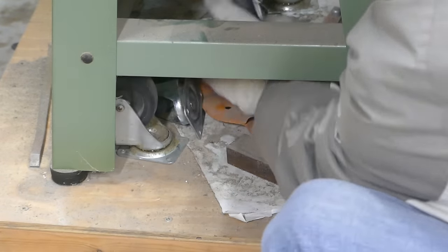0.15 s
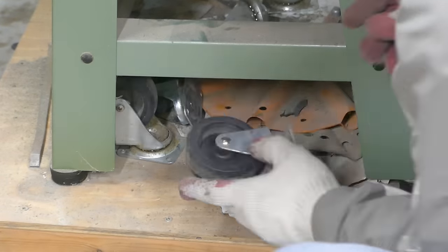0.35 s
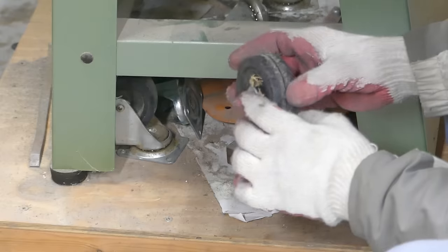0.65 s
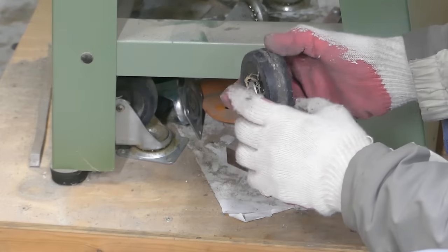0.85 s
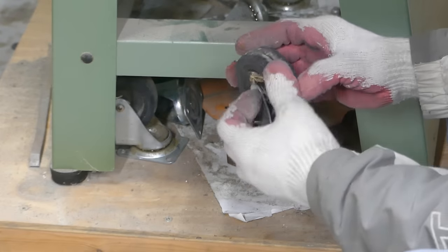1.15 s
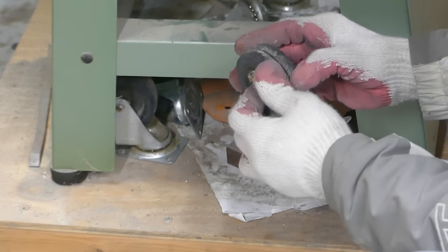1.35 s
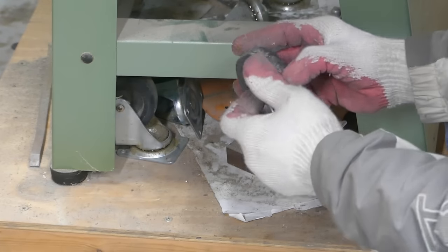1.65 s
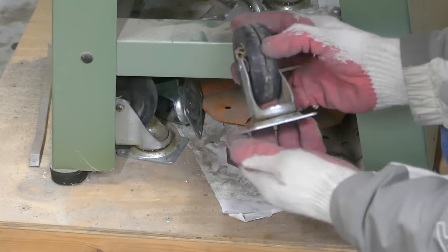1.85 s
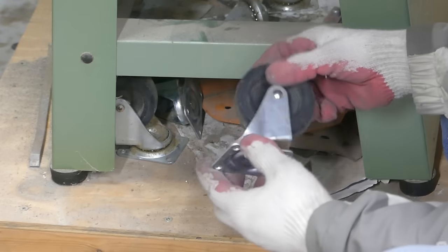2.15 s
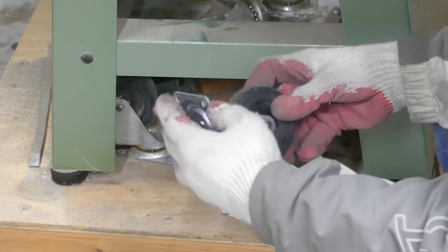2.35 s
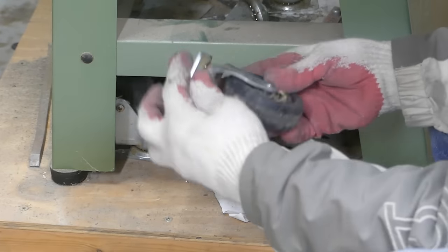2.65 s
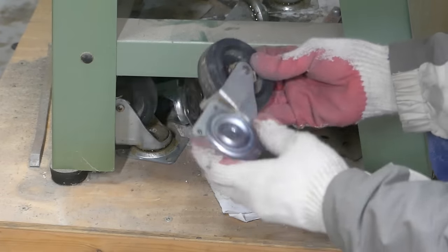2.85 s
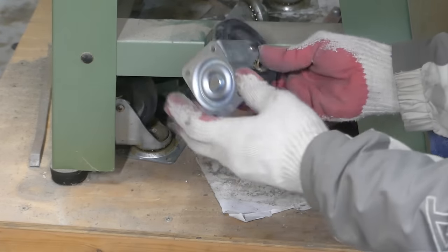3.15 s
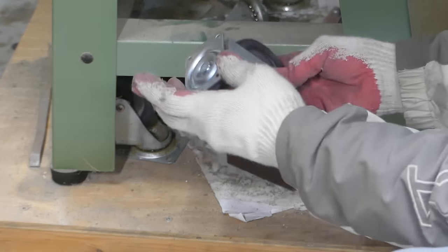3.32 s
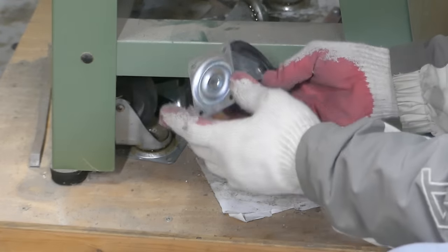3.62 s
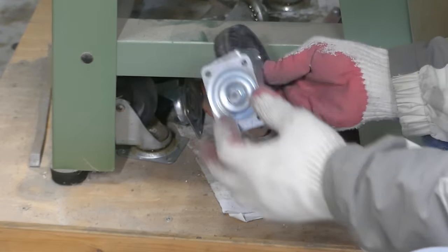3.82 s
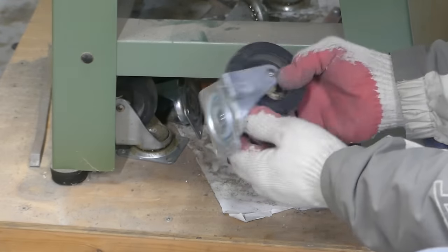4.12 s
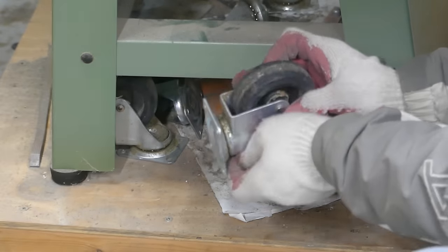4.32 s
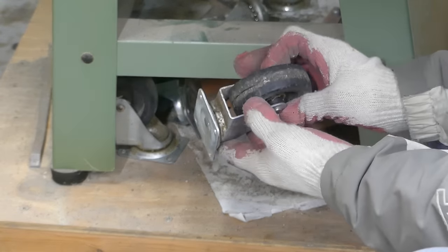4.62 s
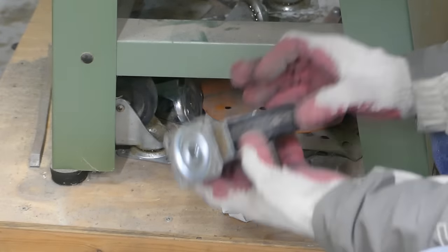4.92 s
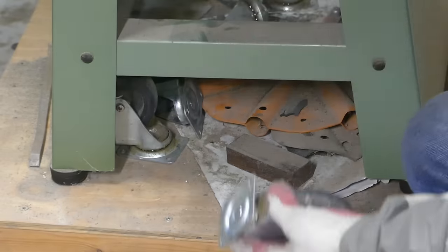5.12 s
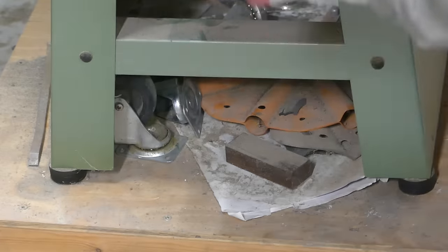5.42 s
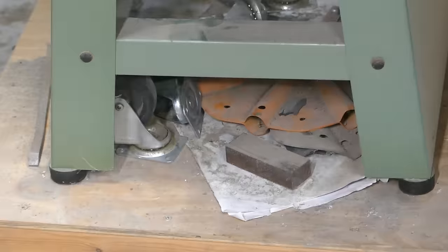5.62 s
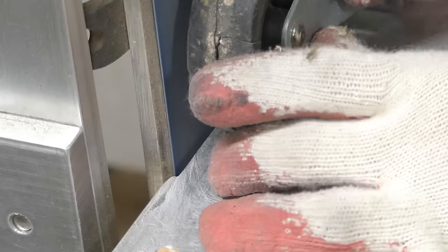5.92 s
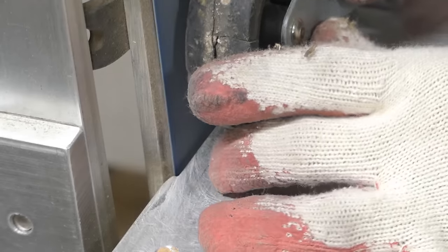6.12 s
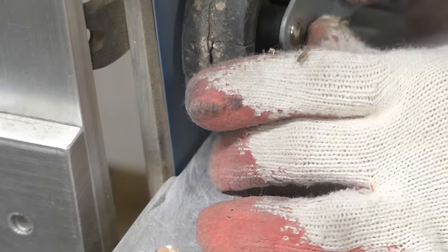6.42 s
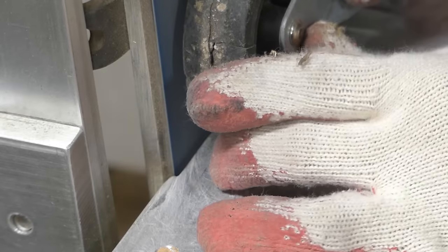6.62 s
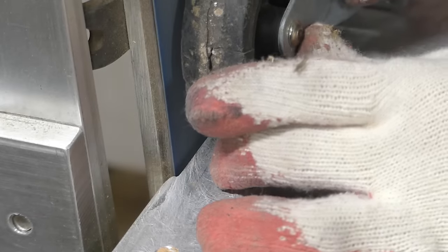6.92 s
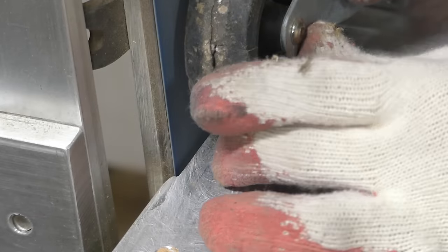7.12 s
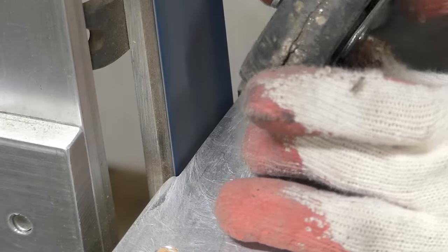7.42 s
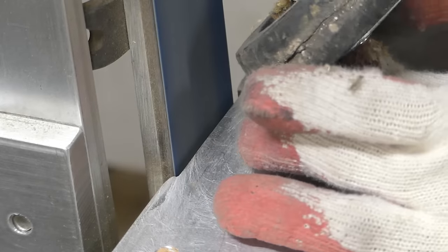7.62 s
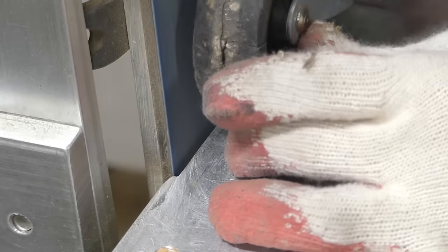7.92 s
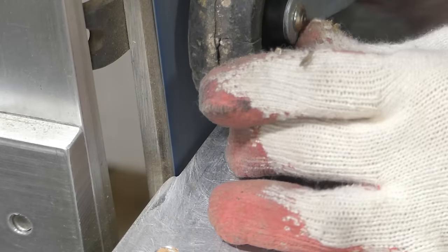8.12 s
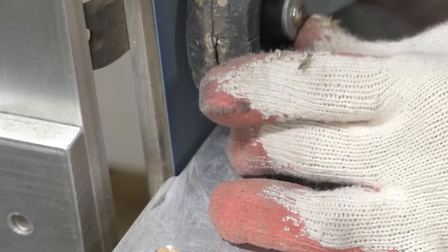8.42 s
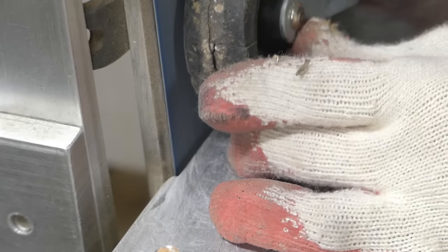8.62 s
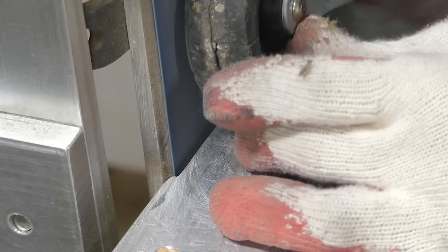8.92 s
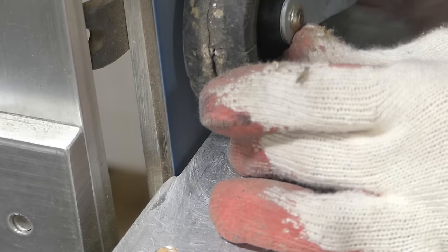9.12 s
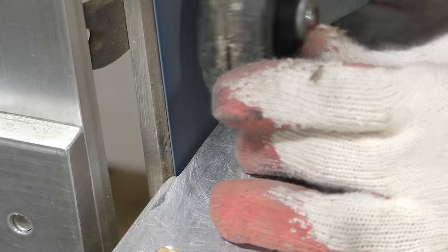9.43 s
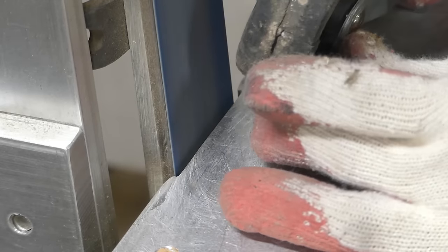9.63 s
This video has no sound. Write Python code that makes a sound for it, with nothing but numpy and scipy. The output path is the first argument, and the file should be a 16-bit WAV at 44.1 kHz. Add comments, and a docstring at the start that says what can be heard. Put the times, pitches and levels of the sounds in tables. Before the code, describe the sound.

Knocks, small metallic clinks and glove rustle in a quiet workshop, cut suddenly to a loud humming, rattling belt grinder with abrasive hiss.

```python
"""A belt grinder runs close by after an abrupt start: motor lines hum and beat slowly as the shaft slips,
scuffed resonators buzz as the belt arm twice a turn, and coloured noise hisses as abrasive on a caster.
Before it, gloved hands pull that steel caster from under a machine stand: enveloped noise and ringing modes
clatter on the wooden bench, then short bursts clink and pitched swells slide as it is turned over.
Gloves and sleeves brush as noise strokes, over quiet room air with a drone and a thin whirr."""
import sys
import numpy as np
from scipy import signal
from scipy.fft import rfft, irfft, next_fast_len
from scipy.io import wavfile

SR = 44100
rng = np.random.default_rng(int(sys.argv[2]) if len(sys.argv) > 2 else 0)


def unload_wav(signal):
    """Save mono or channel-first audio to the path in sys.argv[1] as 16-bit WAV at rate SR, clipped to [-1, 1]."""
    wavfile.write(
        sys.argv[1],
        SR,
        np.round(np.clip(np.atleast_2d(signal).T, -1, 1) * 32767).astype(np.int16),
    )


N = 430416
TIME = np.arange(N) / SR

START_S = 5.790   # the handling stops and the grinder sounds
LINE_HZ = 59.96   # two cycles make one shaft turn
# the shaft slips behind the mains and comes back into step once in this time, so the machine beats slowly
SLIP_S = 2.12
# the belt and arm run louder at first: extra level in dB, and the time constant of its decay
SETTLE_DB, SETTLE_S = 2.3, 0.47
CUTOFF_HZ = 15850
# between strokes the hands never quite rest
RESTING_BRUSH_DB, RESTING_FOLDS_DB = -72, -68.5
CLINK_ATTACK_S = 0.0006
# the ring is a peak in dB above the steel colour, the width its half width
SLIDE_SWELL_S, SLIDE_T60_S, SLIDE_WIDTH_HZ, SLIDE_RING_DB = 0.045, 0.35, 330, 15

# In colour tables each row: frequency in Hz, relative level in dB per Hz; a layer's level is set where it is mixed.
# In resonance tables each row: frequency in Hz, width in Hz, relative gain in dB.

# Workshop air, a colour table; then the modes of its faint drone, a resonance table.
AIR_COLOUR = [(30, -26.5), (79, -19), (130, -10), (215, -1.5), (540, -1.5), (1130, -5.5), (1700, -16.5),
              (2350, -13), (3400, -12), (7470, -21), (12600, -19), (16000, -26.5)]
DRONE_MODES = [(202, 7.9, 0.5), (261, 4.5, 2), (500, 6, -22.5)]
# Colours of the noise that feeds the drone and the whirr, and the whirr's one resonance.
DRONE_FEED = [(80, -19), (180, -7), (300, 2), (700, -13.5)]
WHIRR_FEED = [(900, -28), (1500, -2), (1800, -0.5), (2600, -9)]
WHIRR_MODES = [(1644, 125, 0)]
# Left-right likeness of the room, the hands, and the bench and grinder.
# Each row: frequency in Hz, likeness from -1 to 1.
FAR_LIKENESS = [(60, 0), (130, 0.59), (640, -0.91), (1400, -0.28), (3100, -0.12), (7000, -0.093),
                (15000, 0.67)]
HANDS_LIKENESS = [(100, 0.56), (700, 0.44), (3000, 0.59), (7000, 0.78), (15000, 1)]
NEAR_LIKENESS = [(60, 0.86), (300, 0.82), (1400, 0.87), (3000, 0.72), (15000, 0.84)]
# Strokes of gloves and sleeves. Each row: middle in seconds, time in seconds from there to 1/e of the power,
# brushing peak in dB, cloth fold peak in dB, both before their uneven grain.
STROKES = [(0.27, 0.079, -55, -47.5), (0.463, 0.088, -53.5, -51), (0.667, 0.061, -52, -54.5),
           (1.1, .1, -64, -70), (1.59, .07, -64, -69), (2.03, 0.19, -61.5, -67), (2.46, 0.12, -61.5, -71),
           (2.834, .11, -59, -64.5), (3.37, 0.086, -63, -61.5), (3.935, .045, -59.5, -62),
           (4.165, 0.059, -58, -59), (4.32, 0.045, -59.5, -60.5), (4.5, .045, -63.5, -71),
           (5.042, .045, -57.5, -58.5), (5.418, 0.18, -51, -52.5), (5.64, 0.2, -50.5, -51)]
# Colours of brushing and of folding cloth.
BRUSH_COLOUR = [(1200, -27.5), (2500, 1), (4500, 3.5), (7000, 1), (10000, -2), (13500, -1.5), (16000, -11)]
FOLDS_COLOUR = [(150, -14.5), (400, -3), (750, 4), (1400, 1.5), (2500, -0.5), (5000, -14.5)]
# Steel sliding on steel. Each row: start in seconds, level in dB before the swell and decay, pitch in Hz.
SLIDES = [(1.54, -52, 6200), (1.57, -49, 7850)]
# Swivel and plate clinks. Each row: start in seconds, level in dB, t60 in seconds, plate ring in dB,
# pitch of the touched part in Hz, its ring in dB, dull body in dB relative to the steel.
CLINKS = [(0.185, -28, .13, 0, 3250, 36, -11), (0.680, -43.5, 0.15, 0, 10000, 5, -18),
          (0.812, -49.5, 0.34, 6, 10300, 6, -21), (1.117, -49, .14, 6, 4050, 11, -13),
          (1.268, -53.5, 0.33, 2, 5100, 10, -8), (1.479, -49.5, 0.26, 18, 10200, 6, -18),
          (1.776, -31.5, 0.21, 13, 8000, -2, -14), (1.996, -47, .19, 8, 3600, 5, -14),
          (2.161, -44, 0.31, 10, 6100, 5, -3.5), (2.468, -56.5, 0.36, 20, 10900, 5, -19),
          (2.595, -41.5, 0.23, 10, 8500, 10, -4), (2.826, -43, 0.19, 12, 8100, 3, -22),
          (2.835, -46, .15, 10, 6550, 22, -20), (3.051, -52.5, 0.18, 8, 4200, 12, -8),
          (3.35, -49, 0.18, 2, 4550, 14, -1), (5.447, -29, 0.16, 13.5, 13750, 5, -19),
          (5.618, -32, 0.13, 2, 4750, 2.5, -12), (5.626, -33, .15, 5, 4750, 2, -19),
          (5.723, -35.5, .11, 13, 6600, 12, -8)]
# Modes of the caster's top plate. Each row: frequency in Hz, half width in Hz, factor on the plate ring's dB.
PLATE_MODES = [(5780, 320, 1.0), (4570, 60, 0.05), (6540, 110, 0.3), (8010, 120, 0.76), (8800, 90, 0.2),
               (9490, 64, 0.1), (13600, 110, 0.6)]
# Colours of the steel contact and of the wheel's body.
CLINK_COLOUR = [(1000, -13.5), (2500, -4.5), (4000, -1.5), (6000, -0.5), (7200, -1), (9500, -1.5),
                (12500, -5.5), (16000, -10)]
BODY_COLOUR = [(150, -49), (500, -4.5), (1300, 2), (2500, 2), (4500, -4.5), (9000, -35)]
# Caster on the bench. Each row: start in seconds, thud in dB and crack in dB before the mix trims,
# t60 in seconds before each part stretches it.
KNOCKS = [(0.002, -13.5, -26.5, 0.091), (0.011, -25, -42, 0.065), (0.026, -20, -30, 0.15),
          (0.048, -18.5, -38, 0.16), (0.054, -20, -48, 0.17), (0.075, -20, -43, 0.22),
          (0.119, -33, -62, 0.17), (0.15, -25.5, -28.5, 0.22), (0.166, -27, -42, 0.11),
          (0.187, -29, -41, 0.2), (0.312, -49, -62, 0.13), (0.393, -55, -49, .2), (0.410, -52, -42.5, 0.21),
          (5.612, -43, -46, 0.089), (5.625, -37, -47, 0.096)]
# Resonances of the bench board, and the colour of the noise that drives them.
BOARD_MODES = [(314, 5.3, -4), (446, 25, -14), (580, 33, -9), (677, 29, 3.5), (766, 50, 1), (1060, 72, 8),
               (1170, 95, 8.5)]
BOARD_FEED = [(150, -15), (450, 15.5), (1500, -16.5), (4000, -18.5)]
# Colours of thud and crack.
THUD_COLOUR = [(30, -21), (280, -35), (420, -15.5), (650, 6), (900, -5.5), (1150, 1.5), (1800, -6.5),
               (3000, -18), (6000, -25.5), (16000, -50)]
CRACK_COLOUR = [(500, -6.5), (1800, 4), (3300, 3), (4600, -5.5), (8000, -2.5), (12000, -9.5), (16000, -14)]
# Motor and frame vibration. Each row: multiple of the line rate (rounded to the nearest half when played),
# rms level in dB before beating, beat depth from 0 to 1, time of a crest in seconds.
HUM_LINES = [(4, -33.5, 0.05, 7.4), (5, -47, 0.2, 6.14), (5.492, -44, 0.2, 6.7), (6, -39, 0.76, 7.62),
             (7, -49, 0.54, 7.36), (7.99, -36.5, 0.7, 7.3), (9.025, -38.5, 0.34, 7.5),
             (10.02, -42, 0.3, 7.47), (10.54, -42.5, .45, 6.86), (11, -40, 0.7, 7.57),
             (12, -33.5, 0.4, 6.6), (13.04, -37.5, .4, 6.14), (14, -43, .25, 6.6), (15, -50, 0.7, 7.87),
             (16.06, -34.5, 0.31, 7.78), (16.98, -43, 0.3, 7.75), (17.92, -40.5, .55, 6.83),
             (19.93, -41, .2, 7.9), (21, -44.5, 0.9, 6.05), (22.07, -45.5, .45, 7.7), (23, -33, 0.34, 6.08),
             (24, -41.5, 0.5, 6.7), (25, -37, 0.2, 7.72), (25.97, -39, 0.8, 7.89), (26.96, -53, .3, 5.3),
             (27.9, -52, 0, 5.6), (31, -44, 0.9, 7.9), (38.2, -46.5, 0.7, 7.2)]
# Lines that also beat twice a slip cycle. Each row: multiple of the line rate, beat depth from 0 to 1,
# time of a crest in seconds.
DOUBLE_BEATS = [(10, .35, 6.25), (14, 0.2, 6.84), (16, 0.49, 6.77), (17, 0.6, 6.53), (20, 0.54, 6.43),
                (24, 0.2, 6.54), (25, 0.5, 6.32)]
# Balance of the hum. Each row: frequency in Hz, left minus right in dB.
HUM_PAN = [(240, -1.0), (400, -2.5), (700, -2.0), (1300, 1.8)]
# Resonances of the belt arm and of the rubbed caster.
ARM_MODES = [(1436, 36, 6), (1471, 35, 6.5), (1645, 76, -14.5), (1864, 72, -11.5), (2060, 30, -8),
             (2290, 37, -7.5), (2534, 47, -6), (4200, 51, -12)]
RUBBED_MODES = [(4200, 180, 9), (4870, 25, 15), (5300, 66, 9.5), (6220, 65, 14.5), (8910, 300, 4.5),
                (12200, 43, -13)]
# Colours of the shaken frame, the belt over its platen, the grit cutting, and the air the grinder stirs.
FRAME_COLOUR = [(200, -25), (380, -10.5), (470, -0.5), (570, -0.5), (670, -10), (850, -21), (2000, -50)]
BELT_COLOUR = [(200, -28), (330, -2), (600, -7), (790, 4.5), (1100, 2.5), (1450, 7.5), (1900, 1),
               (2700, -9.5), (3500, -33), (8000, -22)]
GRIT_COLOUR = [(1200, -19), (2500, 0), (3200, -2.5), (4100, 2), (5400, 0.5), (6200, 2), (7500, -4),
               (8900, -2), (10500, -6), (13500, -6), (16000, -13.5)]
DRAUGHT_COLOUR = [(25, -6), (60, -5.5), (130, -5.5), (220, 4), (330, 3.5), (700, 11.5), (2000, -6.5)]
# Beats of frame, belt and arm, and the arm's faster flutter. Each holds: level in dB before beating,
# beat depth from 0 to 1, beats per slip cycle (rounded when played, 0 is a steady lift), time of a crest in seconds.
FRAME_BEAT = (-36, .6, 1, 7.5)
BELT_BEAT = (-27.5, 0.26, 1.5, 7.85)
ARM_BEAT = (-32.5, 0.27, 0, 7)
ARM_FLUTTER = (0, .18, 4, 5.92)
# How hard the caster is pressed on the belt. Each row: time in seconds, abrasive hiss in dB before trim and grain.
PRESSURE = [(5.82, -24.5), (5.95, -25.5), (6.64, -24.5), (7.3, -26), (9.05, -24.5), (9.71, -26),
            (9.74, -24)]


def from_db(db):
    """Decibels to gain."""
    return np.exp(np.asarray(db) * (np.log(10) / 20))


def rms_one(x):
    """Scale to unit power."""
    return x / np.sqrt(np.mean(x ** 2) + 1e-20)


def at_hz(points, hz):
    """Read a table on a log-frequency axis."""
    known_hz, values = np.transpose(points)
    return np.interp(np.log(np.maximum(hz, 1)), np.log(known_hz), values)


def drift(rate, size=N):
    """Random wander of spread about 1, drawn as straight lines between rate knots a second."""
    knots = rng.standard_normal(2000)
    wander = np.interp(TIME[:size] * rate + rng.random(), np.arange(len(knots)), knots)
    return wander * np.sqrt(3 / 2)   # makes up for the spread lost between knots


def noise(colour, likeness, size=N, peaks=(), ripple_db=0):
    """Stereo noise of a given colour and left-right likeness, with peaks and a random spectral ripple; rms 1."""
    padded = next_fast_len(size)
    hz = np.fft.rfftfreq(padded, 1 / SR)
    db = at_hz(colour, hz)
    for centre, half_width, gain_db in peaks:
        db = db + gain_db / (1 + ((hz - centre) / half_width) ** 2)
    db = db + ripple_db * np.interp(hz, np.linspace(0, SR / 2, 150), rng.standard_normal(150))
    mid, side = rfft(rng.standard_normal((2, padded))) * from_db(db)
    alike = np.clip(at_hz(likeness, hz), -1, 1)
    mid = mid * np.sqrt(1 + alike)
    side = side * np.sqrt(1 - alike)
    return rms_one(irfft([mid + side, mid - side], padded)[:, :size])


def white(alike):
    """White stereo noise with one likeness at all pitches; rms 1."""
    mid, side = rng.standard_normal((2, N))
    return rms_one(np.sqrt(1 + alike) * mid + np.sqrt(1 - alike) * side * [[1], [-1]])


def resonate(x, modes):
    """Parallel two-pole resonances with alternating signs; rms 1."""
    out = 0
    for k, (hz, width, db) in enumerate(modes):
        r = np.exp(-np.pi * width / SR)
        zeros = np.array([1, 0, -1]) * (1 - r * r) / 2
        poles = [1, -2 * r * np.cos(2 * np.pi * hz / SR), r * r]
        out = out + (-1) ** k * from_db(db) * signal.lfilter(zeros, poles, x)
    return rms_one(out)


def high_pass(x, hz):
    """Take the bass out gently."""
    return signal.sosfilt(signal.butter(2, hz, "high", fs=SR, output="sos"), x)


def blows(times, levels_db, t60s, swell):
    """Envelope of blows that swell and die away within half a second; their powers add."""
    power = np.zeros(N)
    for s, db, t60 in np.broadcast(times, levels_db, t60s):
        at = int(s * SR)
        age = TIME[:min(SR // 2, N - at)]
        blow = from_db(db - 60 * age / t60) * (1 - np.exp(-age / swell))
        power[at:at + len(age)] += blow ** 2
    return np.sqrt(power)


def beat(db, depth, beats, crest_s, size=N):
    """Gain of two vibrations drifting in and out of step: broad crests, narrow dips."""
    angle = 2 * np.pi * round(beats) * (TIME[-size:] - crest_s) / SLIP_S
    return from_db(db) * np.sqrt(1 + depth ** 2 + 2 * depth * np.cos(angle))


def each_turn(x, memory):
    """The same roughness returns with every shaft turn and changes slowly, combing noise into lines; rms 1."""
    out, turn = x.copy(), round(2 * SR / LINE_HZ)
    for i in range(turn, N, turn):
        out[:, i:i + turn] += memory * out[:, i - turn:i][:, :N - i]
    return rms_one(out)


def workshop(whirr_from_s=0.7):
    """Quiet room air as coloured noise, with a resonant drone; a thin whirr sets in early on."""
    air = from_db(-58) * noise(AIR_COLOUR, FAR_LIKENESS)
    drone = from_db(-66) * resonate(noise(DRONE_FEED, FAR_LIKENESS), DRONE_MODES)
    whirr = from_db(-60) * resonate(noise(WHIRR_FEED, FAR_LIKENESS), WHIRR_MODES)
    return air + drone + whirr * (TIME > whirr_from_s)


def gloves(grain_db=1.2, catch_db=2.0):
    """Knit gloves brush over steel and sleeves fold; each stroke is a bell curve of noise, catching unevenly."""
    brush_power, folds_power = from_db(RESTING_BRUSH_DB) ** 2, from_db(RESTING_FOLDS_DB) ** 2
    for s, half_length, brush_db, folds_db in STROKES:
        stroke = np.exp(-((TIME - s) / half_length) ** 2)
        brush_power = brush_power + from_db(brush_db) ** 2 * stroke
        folds_power = folds_power + from_db(folds_db) ** 2 * stroke
    brush = np.sqrt(brush_power) * from_db(grain_db * drift(150)) * noise(BRUSH_COLOUR, HANDS_LIKENESS)
    folds = np.sqrt(folds_power) * from_db(catch_db * drift(60)) * noise(FOLDS_COLOUR, HANDS_LIKENESS)
    return brush + folds


def slides():
    """The swivel turns: steel rubs on steel in a soft, pitched swell."""
    out, age = np.zeros((2, N)), TIME[:SR // 2]
    for s, db, hz in SLIDES:
        swell = from_db(db - 60 * age / SLIDE_T60_S) * (1 - np.exp(-age / SLIDE_SWELL_S))
        peaks = [(hz, SLIDE_WIDTH_HZ, SLIDE_RING_DB)]
        rub = noise(CLINK_COLOUR, HANDS_LIKENESS, size=len(age), peaks=peaks, ripple_db=4.0)
        at = int(s * SR)
        out[:, at:at + len(age)] += swell * rub
    return out


def clinks(part_width_hz=330, sing_db=-20, sing_t60=0.2):
    """Play in the swivel: the loose bearing chatters as a noise burst, ringing the top plate and a touched part."""
    out, age = np.zeros((2, N)), TIME[:SR // 3]
    for s, db, t60, plate_db, part_hz, part_db, body_db in CLINKS:
        peaks = [(hz, width, share * plate_db) for hz, width, share in PLATE_MODES]
        peaks.append((part_hz, part_width_hz, part_db))
        steel = noise(CLINK_COLOUR, HANDS_LIKENESS, size=len(age), peaks=peaks, ripple_db=3.5)
        body = from_db(body_db) * noise(BODY_COLOUR, HANDS_LIKENESS, size=len(age))
        onset = from_db(db) * (1 - np.exp(-age / CLINK_ATTACK_S))
        chatter = from_db(-60 * age / t60) * (steel + body)
        # the plate's main mode sings with its own decay, a little detuned by each grip
        main_hz = PLATE_MODES[0][0] * (1 + 0.0067 * rng.normal())
        sing_angle = 2 * np.pi * main_hz * age + drift(60, size=len(age))
        sing = from_db(sing_db + plate_db - 60 * age / sing_t60) * np.sin(sing_angle)
        at = int(s * SR)
        out[:, at:at + len(age)] += onset * (chatter + sing)
    return out


def bench_knocks(contact_t60=0.029, tail_db=-2.0):
    """The caster bumps over the board: a short hollow thud and a bright crack, then bench and room ring on."""
    s, thud_db, crack_db, t60 = np.transpose(KNOCKS)
    contact = blows(s, thud_db + 0.5, contact_t60, swell=0.00015) * noise(THUD_COLOUR, NEAR_LIKENESS)
    board = from_db(1) * noise(THUD_COLOUR, NEAR_LIKENESS)
    board = board + from_db(-2.5) * resonate(noise(BOARD_FEED, NEAR_LIKENESS), BOARD_MODES)
    tail = blows(s, thud_db + tail_db, t60 * 1.21, swell=0.00051) * board
    crack = blows(s, crack_db, t60 * 1.4, swell=0.0004) * from_db(1.13 * drift(300))
    crack = crack * noise(CRACK_COLOUR, HANDS_LIKENESS, ripple_db=0.5)
    # the small board radiates little bass
    return high_pass(contact + tail, 330) + crack


def hum(size, fade_db=1.0, skirt=0.35, scatter=1.0):
    """Motor lines as sines, each beating with the slip of the shaft; the belt blurs the high ones."""
    # the lines' phases start from a quarter cycle after each scuff of the belt
    phase = 2 * np.pi * (LINE_HZ * TIME[-size:] - 1 / 4)
    phase = phase + 0.0039 * drift(4.76, size=size)
    out, flutter = np.zeros((2, size)), beat(*ARM_FLUTTER, size=size)
    double = {k: beat(0, depth, 2, crest_s, size=size) for k, depth, crest_s in DOUBLE_BEATS}
    for multiple, db, depth, crest_s in HUM_LINES:
        k = round(2 * multiple) / 2   # whole multiples of the shaft rate
        blur = min(skirt * k / 20, 1 / 4)
        # the arm's lines stay nearly in step, so they throb once a cycle
        on_arm = 22 <= k <= 28
        spread = 1 / 8 if on_arm else 2 * scatter   # radians
        angle = k * phase + rng.normal() * spread + blur * drift(15, size=size)
        gain = beat(db, depth, 1, crest_s, size=size) * double.get(k, 1)
        if on_arm:
            gain = gain * flutter
        gain = gain * from_db(fade_db * min(k / 10, 1) * drift(3.1, size=size))
        gain = gain * (1 + blur * drift(14, size=size))
        pan_db = at_hz(HUM_PAN, k * LINE_HZ)
        lag = 0.13 * rng.choice([-1, 1])   # radians, opposite in the two channels
        line = np.sin([angle + lag, angle - lag])
        out += np.sqrt(2) * gain * from_db([[pan_db / 2], [-pan_db / 2]]) * line
    return np.pad(out, ((0, 0), (N - size, 0)))


def rattle(weak_db=-2.5, memory=0.55, uneven_db=0.1):
    """The belt scuffs the arm twice a shaft turn, strong then weak and a little uneven, and sets it ringing."""
    cycles = TIME * LINE_HZ
    count = cycles.astype(int)
    uneven = uneven_db * rng.standard_normal(count[-1] + 1)[count]
    strength = from_db(weak_db * (count % 2) + uneven)
    scuff = np.exp(-2 * (cycles % 1))
    scuffs = scuff * strength * each_turn(white(0.85), memory)
    # the belt presses back on the arm and damps it before the next scuff
    free = 1 + 0.55 * np.cos(2 * np.pi * (cycles - 1 / 4))
    return rms_one(free * high_pass(resonate(scuffs, ARM_MODES), 900))


def abrasive(throb=0.061, grain_db=0.5, hiss_db=-0.44):
    """Grit hisses and rings the caster, following the hand's pressure and throbbing with the motor's vibration."""
    pressure_db = np.interp(TIME, *np.transpose(PRESSURE))
    bite = 1 + throb * np.cos(2 * np.pi * 4 * LINE_HZ * TIME)
    bite = bite * from_db(pressure_db + hiss_db + grain_db * drift(180))
    cutting = from_db(1.0) * noise(GRIT_COLOUR, NEAR_LIKENESS, ripple_db=2.46)
    ringing = from_db(-8.0) * resonate(white(0.82), RUBBED_MODES)
    return bite * each_turn(cutting + ringing, memory=0.26)


def grinder():
    """Motor hum, arm rattle, shaken frame, belt rush, stirred air and abrasive, all let in at once."""
    settling = from_db(SETTLE_DB * np.exp(-np.maximum(TIME - START_S, 0) / SETTLE_S))
    motor = hum(size=N - int(START_S * SR))
    arm = settling * beat(*ARM_BEAT) * beat(*ARM_FLUTTER) * rattle()
    frame = beat(*FRAME_BEAT) * each_turn(noise(FRAME_COLOUR, NEAR_LIKENESS), memory=0.87)
    belt = settling * beat(*BELT_BEAT) * each_turn(noise(BELT_COLOUR, NEAR_LIKENESS), memory=0.61)
    draught = from_db(-34) * noise(DRAUGHT_COLOUR, NEAR_LIKENESS)
    rush = (arm + frame + belt + draught + abrasive()) * from_db([[0.25], [-0.25]])   # slightly left
    return (motor + rush) * np.clip((TIME - START_S) / 0.0017, 0, 1)


def scene():
    """Handling first, then the grinder."""
    handling = workshop() + gloves() + slides() + clinks() + bench_knocks()
    return handling * (TIME < START_S) + grinder()


def record(dry):
    """A steep elliptic low-pass cuts the top."""
    return signal.sosfilt(signal.ellip(12, 0.1, 80, CUTOFF_HZ, fs=SR, output="sos"), dry)


dry = scene()
out = record(dry)
unload_wav(out)
```